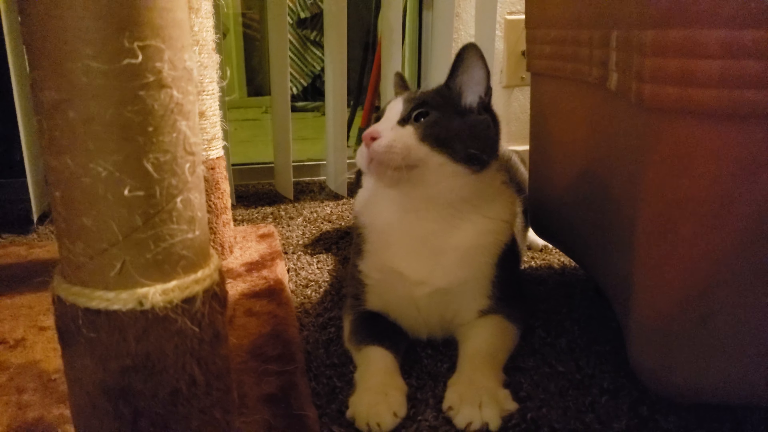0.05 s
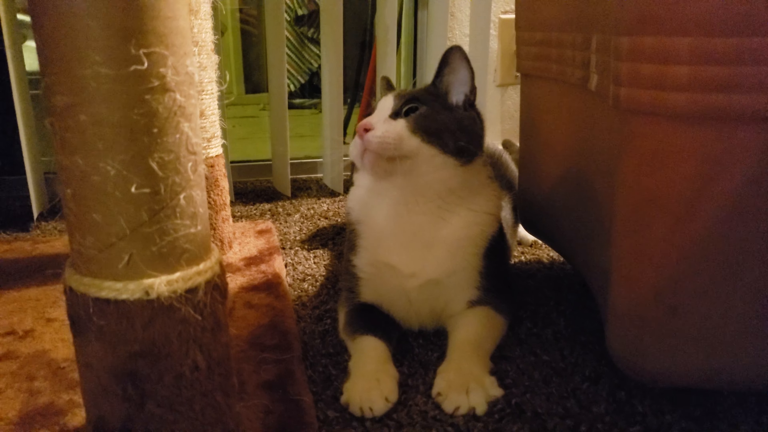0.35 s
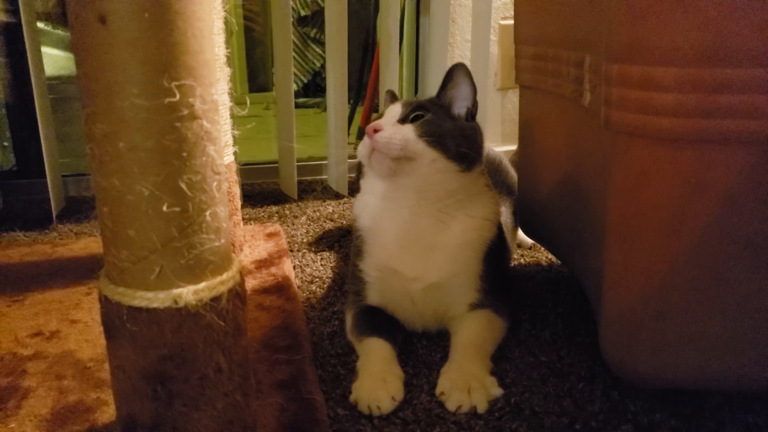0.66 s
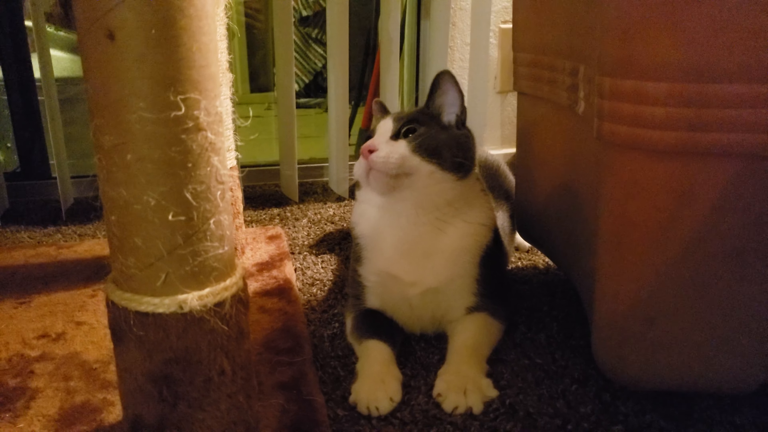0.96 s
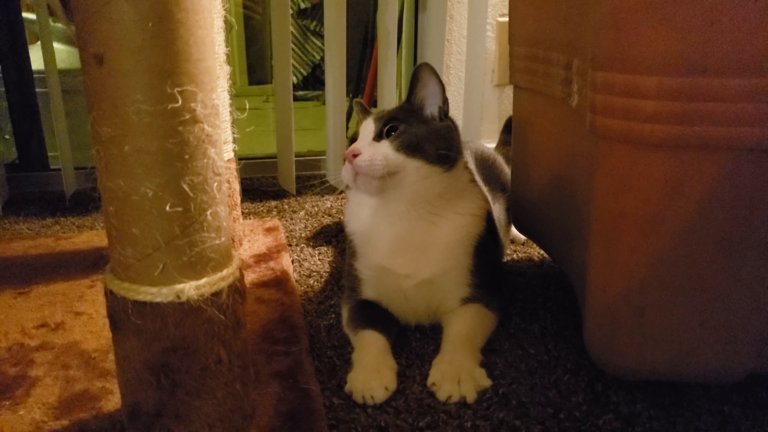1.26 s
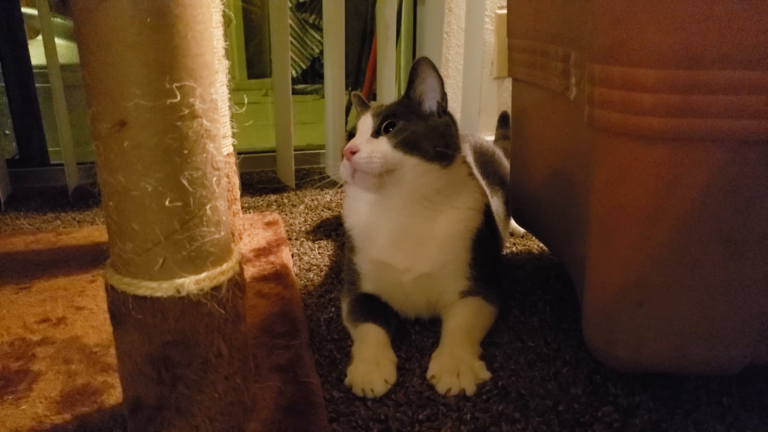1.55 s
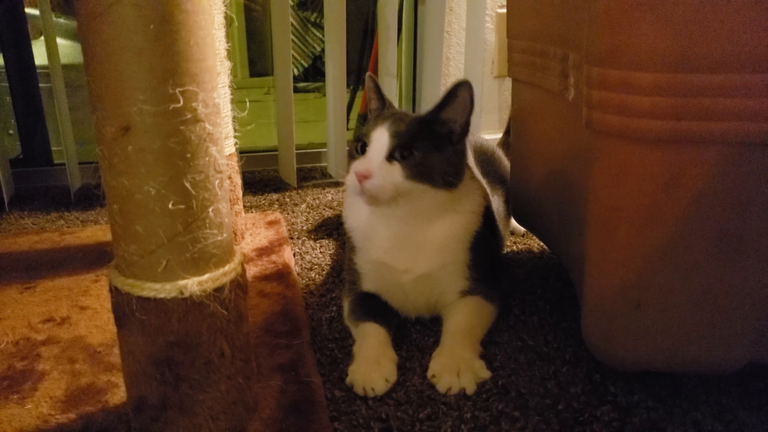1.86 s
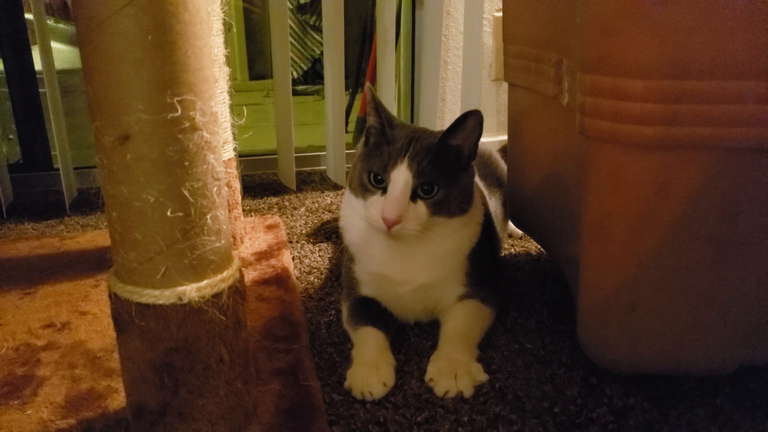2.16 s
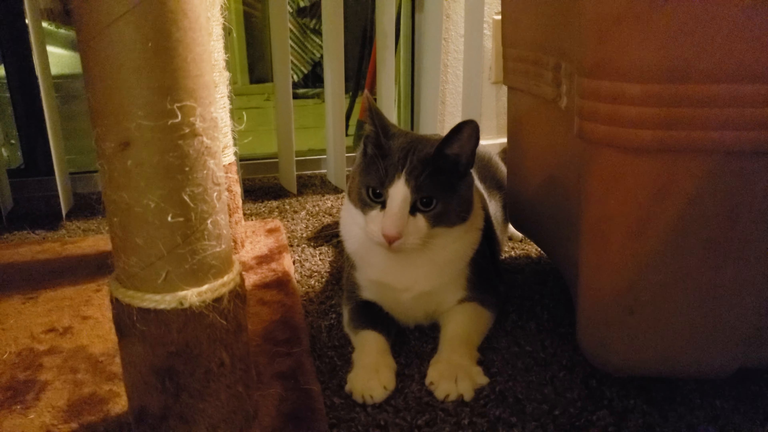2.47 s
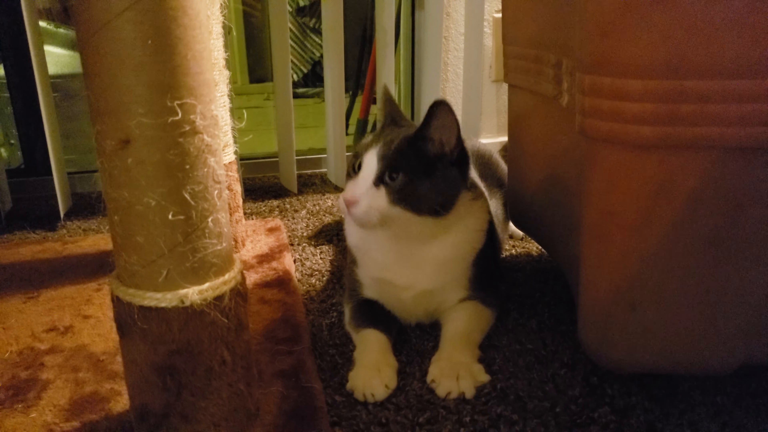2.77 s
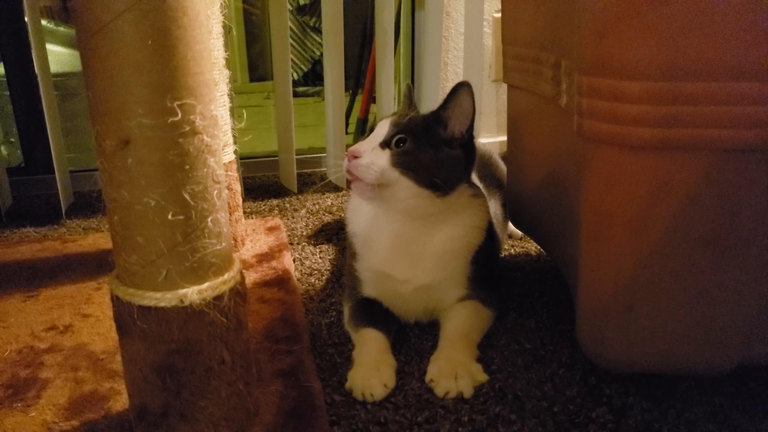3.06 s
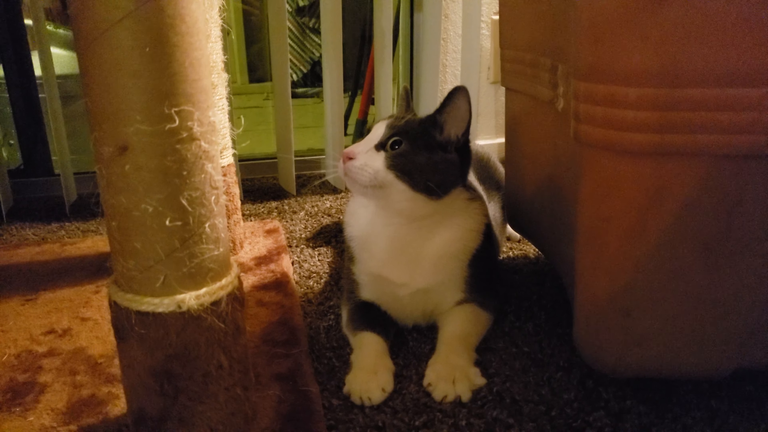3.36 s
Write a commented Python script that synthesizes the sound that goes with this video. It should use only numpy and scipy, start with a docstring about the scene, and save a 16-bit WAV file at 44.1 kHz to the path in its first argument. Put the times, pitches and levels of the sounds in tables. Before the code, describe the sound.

A feather on a thin wand is flicked in light, quick swishes in a small quiet room. After a brief lull it is dragged to and fro over carpet, closer and louder, in short irregular strokes of bright hiss and papery rasp. Sharp ticks, small wand knocks and soft floor thumps dot the movement. A close stereo microphone hears it mostly toward the left, over a low household rumble.

```python
"""In a small quiet room, a feather on a thin wand is flicked, then dragged to and fro over carpet.
Stick-slip friction makes the sound: barbs slip over the pile in dense tiny clicks that merge into a
hiss, and the stiffer vane rasps. Bright ticks come as the feather lands or a barb snaps; now and then
the quill chirps, the wand knocks or the floor thumps. A stereo microphone hears it close by, over the
low rumble of the house."""
import sys
import numpy as np
from scipy import signal
from scipy.fft import rfft, irfft
from scipy.io import wavfile
from scipy.ndimage import uniform_filter1d, map_coordinates

SR = 44100
rng = np.random.default_rng(int(sys.argv[2]) if len(sys.argv) > 2 else 0)


def wav_record(signal):
    """Record a signal, one row per channel, as 16-bit PCM in the file named by sys.argv[1]."""
    frames = np.transpose(np.atleast_2d(signal))
    bounded = np.clip(frames, -1, 1)
    # unit amplitude maps onto the largest positive 16-bit level
    quanta = np.round(bounded * 32767).astype(np.int16)
    wavfile.write(sys.argv[1], SR, quanta)


N = 407925
TIME = np.arange(N) / SR
FREQ = np.maximum(np.arange(N // 2 + 1) * SR / N, 1)
ON_CARPET = TIME > 3.2  # from here on the feather is close by and dragged


def feather():
    """Stick-slip friction: fine barbs hiss and the stiffer vane rasps, first flicked, then dragged."""
    # spectrum of the barbs: frequency_hz, density_db
    barb_spectrum = [(4200, -42.5), (6000, -8), (6900, -3.5), (8500, -7.5), (10000, -2.5), (11200, -1.5),
                     (11900, -0.5), (13500, 0.5), (15500, 1), (16500, -7.5)]
    # spectrum of the flicked vane: frequency_hz, density_db
    flicked_spectrum = [(350, -38), (800, -13.5), (1200, -16), (1600, -18.5), (2100, -10), (2600, -10.5),
                        (3100, -7), (4200, -5), (5150, 0.5), (5700, -2), (7200, -4.5), (8500, -11.5)]
    hiss_gain, rasp_gain = strokes()
    barbs = friction(rate=9000, spread_db=2.5, reflection=0.32, flutter_db=2.0)
    hiss = unit(colour(barbs, shape(barb_spectrum)))
    scrape = friction(rate=5000, spread_db=1.5, reflection=0.45, flutter_db=1.4)
    # a narrow microphone resonance near 12 kHz sharpens the hiss of the early flicks
    sharpened = unit(colour(hiss, 1 + 1.1 * resonance(12070, 320) + 0.33 * resonance(7200, 700)))
    flicked = hiss_gain * sharpened + rasp_gain * unit(colour(scrape, shape(flicked_spectrum)))
    # a few stiffer barbs tick above the hiss
    ticks = ports(slips(rate=420, spread_db=2.0), slips(rate=420, spread_db=3.0), share=0.5)
    crackle = undb(-11.5) * unit(colour(ticks, shape(barb_spectrum)))
    dragged = hiss_gain * (hiss + crackle) + rasp_gain * dragged_vane(scrape)
    return np.where(ON_CARPET, dragged * snags(rate=83, size=0.75, decay_s=0.00043), flicked)


def strokes():
    """Amplitude modulation: strokes and quick flicks set the gains of hiss and rasp at each port."""
    # strokes of the feather: start_s, rise_s, fall_s, hiss_db, rasp_re_hiss_db, pan_db
    sweeps = [(0, 0.024, 0.037, -45, 7.0, 4), (0.05, 0.068, 0.035, -56, 3.5, 5),
              (0.14, 0.033, 0.032, -42.5, 0.5, 3.5), (0.269, 0.057, 0.024, -47.5, -7, 7),
              (0.351, 0.068, 0.026, -42.5, 1.5, 4), (0.492, 0.032, 0.014, -50, -10, 8),
              (0.53, 0.075, 0.034, -63.5, -3, 3), (0.625, 0.04, 0.013, -41, -3.5, 2),
              (0.82, 0.052, 0.025, -65, 2, 3), (0.886, 0.042, 0.028, -43.5, -2.5, 8),
              (1.09, 0.025, 0.064, -41, -3, 6), (1.22, 0.032, 0.043, -42, -8, 6),
              (1.33, 0.18, 0.01, -62, -20, 16), (1.624, 0.017, 0.064, -46, -4.5, 4),
              (1.802, 0.018, 0.12, -47.5, -4, 5), (1.949, 0.029, 0.023, -49, -3.5, 6),
              (2.061, 0.007, 0.089, -55.5, -9.5, 8), (2.15, 0.018, 0.036, -61, -13, 14),
              (2.203, 0.12, 0.012, -53.5, -14, 16), (2.431, 0.096, 0.062, -66, -8, 18),
              (2.645, 0.11, 0.104, -71, -12, 4.5), (3.563, 0.01, 0.14, -64.5, -9.0, 12),
              (3.711, 0.17, 0.067, -48.5, -8.5, 13), (3.885, 0.076, 0.11, -48, -8, 19),
              (4.086, 0.084, 0.078, -49.5, -10.5, 25), (4.25, 0.089, 0.042, -43.5, -8, 23.5),
              (4.363, 0.034, 0.067, -48, -5, 26), (4.475, 0.068, 0.11, -45.0, -4.5, 19),
              (4.586, 0.093, 0.13, -37.0, -7, 15), (4.79, 0.074, 0.095, -46.5, -8, 10),
              (4.914, 0.07, 0.073, -50, -8, 10), (5.309, 0.085, 0.029, -45.5, -10, 5),
              (5.4, 0.1, 0.082, -51, -6, 7), (5.583, 0.069, 0.11, -43.5, -7, 3),
              (5.738, 0.1, 0.069, -40, -12.5, 1), (5.905, 0.068, 0.075, -42.5, -7, 3),
              (6.048, 0.089, 0.098, -40.0, -8.5, 3), (6.221, 0.079, 0.075, -46.5, -5, 4),
              (6.361, 0.024, 0.14, -59.5, -10.5, 2), (6.479, 0.15, 0.02, -52, -5.5, 6),
              (6.848, 0.12, 0.12, -40.0, -8.5, 5.5), (7.06, 0.094, 0.02, -41, -9.5, 8),
              (7.385, 0.061, 0.1, -50.5, -2.5, 17), (7.545, 0.074, 0.045, -41.5, -5.5, 12),
              (7.665, 0.025, 0.17, -42.5, -7, 11), (7.849, 0.11, 0.046, -39.5, -10.5, 8),
              (7.985, 0.11, 0.061, -40.5, -7.5, 7), (8.142, 0.028, 0.08, -56, -2.0, 5),
              (8.222, 0.081, 0.18, -51.5, -10.5, 4), (8.717, 0.064, 0.096, -46, -8.5, 2),
              (8.885, 0.066, 0.066, -45.5, -11, 1.5), (9.0, 0.1, 0.073, -47.5, 5.5, 5),
              (9.165, 0.058, 0.087, -50, -2, 1)]
    # flicks of its tip: centre_s, hiss_db, half_length_s, rasp_re_hiss_db, pan_db
    flicks = [(0.66, -28, 0.0018, 0.5, 3), (1.474, -36.5, 0.0069, -14, 8), (2.289, -35.5, 0.0059, -18.5, 6),
              (4.666, -31, 0.0026, -16, 18), (4.84, -45.5, 0.0035, -19, 15), (4.907, -47, 0.0032, -2, 14),
              (5.031, -37, 0.0043, -6, 19), (6.95, -47, 0.0039, -22, 11), (6.99, -36, 0.0044, -31, 7),
              (7.158, -32.5, 0.0079, -8, 11), (8.474, -54, 0.0053, -8.5, 2), (8.989, -37, 0.0045, -6.5, 3)]
    hiss_gain, rasp_gain = np.zeros((2, N)), np.zeros((2, N))
    for start_s, rise_s, fall_s, hiss_db, rasp_db, pan_db in sweeps:
        push = undb(hiss_db) * stroke(start_s, rise_s, fall_s)
        hiss_gain += push * sides(pan_db)
        # the microphone body shades the lower rasp far less than the hiss
        rasp_gain += push * (undb(rasp_db) * sides(0.33 * pan_db - 3.0))
    for centre_s, hiss_db, half_s, rasp_db, pan_db in flicks:
        push = undb(hiss_db) * swell(centre_s, half_s)
        hiss_gain += push * sides(pan_db)
        rasp_gain += push * undb(rasp_db)
    return hiss_gain, rasp_gain


def stroke(start_s, rise_s, fall_s, touch_s=0.0056, contact_share=0.2, speed_power=1.86):
    """Friction noise grows as a power of speed: the feather lands, speeds up, slows and lifts off."""
    gain, moving = np.zeros(N), (TIME > start_s) & (TIME < start_s + rise_s + fall_s)
    t = TIME[moving] - start_s
    speed = np.sin(np.pi / 2 * np.interp(t, [0, rise_s, rise_s + fall_s], [0, 1, 0]))
    contact = np.clip(np.minimum(t, rise_s + fall_s - t) / touch_s, 0, 1)
    gain[moving] = contact * (contact_share + (1 - contact_share) * speed ** speed_power)
    return gain


def friction(rate, spread_db, reflection, flutter_db):
    """Comb filtering: slips interfere with their reflection off furniture as the feather moves."""
    place = walk(4)
    lead_s = 0.00022 * (1 + 0.3 * place)
    pair = ports(slips(rate, spread_db), slips(rate, spread_db), share=0.85, lead_s=lead_s)
    echo_s = 0.000807 * np.exp(0.3 * place)
    pair = np.array([x + reflection * delay(x, echo_s * k) for x, k in zip(pair, (1, 1.25))])
    # tufts catch and release whole groups of barbs
    return pair * undb(flutter_db * walk(170))


def slips(rate, spread_db):
    """A Poisson process: tiny clicks, rate per second, with a log-normal spread of strength."""
    sizes = undb(spread_db * np.clip(noise(), -3, 3))
    return unit((rng.random(N) < rate / SR) * noise() * sizes)


def dragged_vane(scrape):
    """Friction drives broad resonances: the rasp takes a papery or a thinner tone as the vane turns."""
    # spectrum of the dragged vane: frequency_hz, density_db
    dragged_spectrum = [(350, -16.5), (800, -6.5), (1100, -14.5), (1650, -19), (2000, -14), (2700, -11),
                        (3250, -9.5), (4100, -0.5), (4700, -1.5), (5500, -7.5), (6900, -4.5), (8500, -12)]
    # how the vane lies on the pile: time_s, papery_re_rasp_db, thin_re_rasp_db
    vane_tones = [(4.0, -9, -3.5), (4.5, -11, -13), (4.9, -21.5, -2), (5.4, -12.5, -1.5), (5.7, -13, -11),
                  (6.2, -8.5, -6.5), (6.55, -22, -1.5), (7.5, -22.5, -3.5), (7.801, -11, 3.5),
                  (8.1, -16.5, 0.5), (8.4, -15, 3.5), (9.1, -18, -10)]
    times_s, *levels_db = np.transpose(vane_tones)
    papery_db, thin_db = (np.interp(TIME, times_s, db) for db in levels_db)
    shaft = friction(rate=3800, spread_db=1.5, reflection=0.43, flutter_db=3.5)
    rasp = unit(colour(scrape, shape(dragged_spectrum)))
    papery = undb(papery_db) * unit(colour(shaft, resonance(hz=2410, width_hz=1300) ** 3))
    thin = undb(thin_db) * unit(colour(shaft, resonance(hz=5470, width_hz=1500) ** 2))
    return unit(rasp + papery + thin)


def snags(rate, size, decay_s):
    """Catch and release: loops of pile hold the vane and let go, in brief surges of friction."""
    jolts = (rng.random(N) < rate / SR) * rng.exponential(size, N)
    surges = signal.lfilter([1], [1, -np.exp(-1 / (decay_s * SR))], np.minimum(jolts, 3))
    return unit(1 + surges)


def bright_ticks(decay_s=0.00079):
    """A short transient has a broad spectrum: bright ticks as the feather lands or a barb snaps."""
    # landings and barb snaps: time_s, level_db, pan_db
    transients = [(0.2765, -36, 3), (.825, -37.5, -6), (1.0979, -29, 9), (1.198, -48, 10),
                  (1.581, -52.5, 10), (1.807, -38.5, 10), (2.065, -37.5, 5), (4.6989, -15, 15),
                  (4.753, -27, 14), (4.7716, -27, 19), (5.3137, -49, 7), (5.3345, -40, 7), (5.356, -37, 1),
                  (5.383, -31, -8), (6.0657, -30.5, 6), (6.299, -32, -3), (6.611, -28.5, 3.5),
                  (6.6265, -34, 5), (6.8518, -33.5, 4), (7.504, -38.5, -4), (8.508, -49, 1),
                  (9.2054, -34.5, 2)]
    force = sum(undb(db) * sides(pan_db) * blow(s, decay_s) for s, db, pan_db in transients)
    tick_spectrum = shape([(800, -15), (3000, -16.5), (7000, 4), (16000, 1.0)])
    return force * unit(colour(ports(noise(), noise(), share=0.77), tick_spectrum))


def wand():
    """Impact excites modes: a chatter of contacts rings the wand, and the struck spot thuds hollowly."""
    # knocks of the wand: time_s, clack_db, thud_db, thud_hz, decay_s, pan_db
    knocks = [(.063, -62, -43.5, 370, 0.0026, 0), (0.658, -36, -38.5, 383, 0.0032, 20),
              (0.822, -49, -52.5, 700, 0.0086, 9), (1.63, -56, -63.5, 1050, .012, 2),
              (1.806, -70, -56, 480, 0.028, 2), (4.598, -20, -35.5, 893, 0.0067, 4),
              (4.6, -44, -35, 327, 0.0074, 2), (4.619, -43, -50, 900, 0.066, -2),
              (4.672, -40.5, -50, 900, 0.0089, -2), (4.838, -68, -46, 312, 0.021, -2),
              (5.026, -53.5, -49.5, 596, 0.019, 1), (6.14, -37, -48.5, 796, 0.0076, 3.5),
              (6.159, -42, -37, 530, 0.0078, -3), (6.285, -40.5, -60, 900, 0.0033, -1),
              (6.299, -46, -66, 1000, 0.0034, 3.5), (6.611, -56, -45, 600, .005, -4),
              (6.624, -54.5, -42.5, 725, 0.0058, 5.5), (7.151, -53, -55, 721, 0.0086, 3.5),
              (8.093, -47.5, -62, 1000, 0.014, 4), (8.702, -61.5, -67, 903, 0.0023, -5.5),
              (8.98, -59, -45, 537, 0.0051, 4.5), (9.022, -33, -39, 960, 0.015, 1.5),
              (9.025, -48, -37, 363, 0.013, 0), (9.059, -47, -55.5, 980, 0.063, 0)]
    # modes of wand and quill: pitch_hz, width_hz, relative_db
    modes = [(1126, 120, 1.5), (1750, 110, -6.5), (2070, 160, -4), (2420, 140, -4.5), (2850, 170, 3.5),
             (3220, 120, 0), (3650, 260, -4.5), (4030, 470, -3.5), (5020, 620, 0.5), (6100, 280, -9.5),
             (7500, 300, -6.5)]
    chatter = ports(slips(20000, 1.5), slips(20000, 1.7), share=0.99)
    clack = chatter * sum(undb(db) * sides(pan_db) * blow(s, decay_s)
                          for s, db, _, _, decay_s, pan_db in knocks)
    ring = sum(undb(db) * resonance(hz, width_hz) for hz, width_hz, db in modes)
    ring += undb(-11.5) * resonance(9000, 7500)
    thuds, shake = np.zeros(N), noise()
    for s, _, db, hz, decay_s, _ in knocks:
        hollow = signal.butter(2, [0.69 * hz, 1.23 * hz], "bandpass", fs=SR, output="sos")
        force = blow(s, decay_s)
        thuds += undb(db) * np.std(force) * unit(signal.sosfilt(hollow, shake * (force + 1e-18)))
    return colour(clack, ring / np.std(ring)) + thuds


def chirps():
    """Stick-slip of the quill settles briefly and roughly on one pitch."""
    # catches of the quill: centre_s, pitch_hz, level_db, half_length_s
    catches = [(0.344, 1400, -63.5, .003), (0.393, 1510, -62.5, 0.018), (6.146, 2250, -46.5, 0.0067),
               (8.419, 1190, -58, 0.0043), (9.027, 2830, -45, 0.0047), (9.108, 5150, -43, .006),
               (9.11, 2810, -44, 0.017)]
    roughness = undb(walk(250))
    return roughness * sum(undb(db) * swell(s, half_s) * noise_band(hz, width_hz=390)
                           for s, hz, db, half_s in catches)


def bumps():
    """Heavily damped oscillation: dull thumps through the carpet die within a few cycles."""
    # soft bumps on the floor: start_s, unfiltered_db, pitch_hz
    impacts = [(.062, -32, 199), (0.449, -41, 59), (0.643, -33, 115), (1.61, -42.5, 110), (2.28, -38.5, 78),
               (2.966, -37, 164), (3.498, -34, 66.2), (3.679, -40.5, 45), (3.888, -34.5, 65),
               (4.844, -39, 200), (5.426, -35, 68), (5.53, -39.5, 73), (7.495, -35.5, 60),
               (7.813, -34.5, 110), (8.149, -42, 135), (8.26, -39.5, 90), (8.52, -35, 315),
               (8.976, -37.5, 121)]
    thumps = sum(undb(db) * blow(s, 1.3 / hz) * np.sin(2 * np.pi * hz * (TIME - s))
                 for s, db, hz in impacts)
    return signal.sosfilt(signal.butter(2, 500, fs=SR, output="sos"), thumps)


def room(pair, far_db=-10.5, near_db=-12.5):
    """Reflections depend on position: the toy drifts among four patterns and sounds drier close by."""
    weights = np.array([walk(9) for _ in range(4)])
    weights = weights / np.linalg.norm(weights, axis=0)
    source = pair.sum(axis=0) / np.sqrt(2) * undb(np.where(ON_CARPET, near_db, far_db))
    return sum(reverberation(source * weight) for weight in weights)


def reverberation(x, dull_t60_s=0.26, treble_t60_s=0.3):
    """The diffuse field of a small furnished room decays exponentially and is weak in treble."""
    t = TIME[:SR // 2]
    tails = rng.standard_normal((2, len(t)))
    dull = signal.sosfiltfilt(signal.butter(2, 6500, fs=SR, output="sos"), tails)
    response = dull * undb(-60 * t / dull_t60_s) + 0.35 * (tails - dull) * undb(-60 * t / treble_t60_s)
    response *= t > 0.004  # gap before the first reflection
    response /= np.sqrt(np.sum(response ** 2) / 2)
    return signal.fftconvolve(x[None], response, axes=1)[:, :N]


def house(level_db=-51, wander_db=0.7):
    """Partly coherent noise: rumble, deeper on the right, faint appliance hum and microphone hiss."""
    # spectrum of the background: frequency_hz, density_db
    house_spectrum = [(20, -37), (32, -19), (42, 3.5), (60, -3.5), (78, 4), (98, -5.5), (125, -3.5),
                      (200, -4.5), (270, -13.5), (360, -16), (720, -27.5), (1050, -40.5), (3800, -49.5),
                      (8500, -59), (12000, -46.5), (16000, -47.5)]
    apart = np.clip(shape([(40, -3.5), (130, -13.5), (500, -7.5), (1500, 5.0), (4000, 0.5)]), 0, 1)
    common = colour(noise(), shape(house_spectrum))
    opposed = np.array([[1], [-1]]) * colour(noise(), shape(house_spectrum) * apart)
    pan_db = np.interp(FREQ, [70, 140, 300], [-5, -1.5, 0])
    air = unit(colour(common + opposed, sides(pan_db)))
    rumble = colour(air, shape([(250, -4.5), (700, -51.5)]))
    wander = undb(wander_db * walk(5))
    hum = sum(undb(db) * noise_band(hz, width_hz=14)
              for hz, db in [(46, -62.5), (119, -65), (170, -64.5)])
    return undb(level_db) * (air - rumble + rumble * wander) + hum * sides(2.5)


def ports(x, scattered, share, lead_s=0.00024):
    """Path difference: the left port leads; the right mixes a late inverted copy with scattered sound."""
    return np.array([x, -np.sqrt(1 - share) * delay(x, lead_s) + np.sqrt(share) * scattered])


def sides(pan_db):
    """Constant-power panning: two gains, with pan_db the level of left minus right."""
    gains = undb(np.array([[1], [-1]]) * pan_db / 2)
    return gains / np.sqrt(np.mean(gains ** 2, axis=0))


def delay(x, lag_s):
    """Propagation delay, fixed or moving."""
    return map_coordinates(x, [np.arange(N) - lag_s * SR], order=2)


def swell(centre_s, half_s):
    """Gaussian envelope: a bell-shaped rise and fall."""
    gain, near = np.zeros(N), np.abs(TIME - centre_s) < 6 * half_s
    gain[near] = np.exp(-((TIME[near] - centre_s) / half_s) ** 2 / 2)
    return gain


def blow(start_s, decay_s):
    """Exponential decay from a sudden start."""
    gain, near = np.zeros(N), (TIME >= start_s) & (TIME < start_s + 10 * decay_s)
    gain[near] = np.exp(-(TIME[near] - start_s) / decay_s)
    return gain


def resonance(hz, width_hz):
    """Response of one damped mode, gain 1 at its centre."""
    return 1 / (1 + 1j * (FREQ ** 2 - hz ** 2) / (FREQ * width_hz))


def shape(points):
    """Spectral envelope: gain at every frequency from (frequency_hz, level_db) points."""
    hz, db = np.transpose(points)
    return undb(np.interp(np.log(FREQ), np.log(hz), db))


def colour(x, response):
    """Linear filtering: the spectrum is multiplied by a frequency response."""
    return irfft(rfft(x) * response, N)


def noise_band(hz, width_hz):
    """Resonance narrows noise to a rough pitch, rms 1."""
    return unit(colour(noise(), resonance(hz, width_hz) ** 2))


def noise():
    """White noise of rms 1."""
    return rng.standard_normal(N)


def walk(rate):
    """Random drift: rate values per second, smoothed, with a spread near 1."""
    hold = int(SR / rate)
    steps = np.repeat(rng.standard_normal(N // hold + 1), hold)
    return 1.3 * uniform_filter1d(uniform_filter1d(steps, hold), hold)[:N]


def undb(db):
    """Decibels to gain."""
    return 10 ** (np.asarray(db) / 20)


def unit(x):
    """Scale to rms 1."""
    return x / np.sqrt(np.mean(x ** 2))


def scene():
    """Superposition: the toy and its reflections add to the floor bumps and the house."""
    toy = feather() + bright_ticks() + wand() + chirps()
    return toy + room(toy) + bumps() + house()


def record(dry, top_hz=15900):
    """Band limiting: an elliptic low-pass cuts the top steeply."""
    return signal.sosfilt(signal.ellip(10, 0.2, 80, top_hz, fs=SR, output="sos"), dry)


dry = scene()
out = record(dry)
wav_record(out)
```